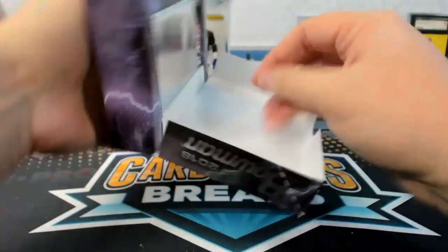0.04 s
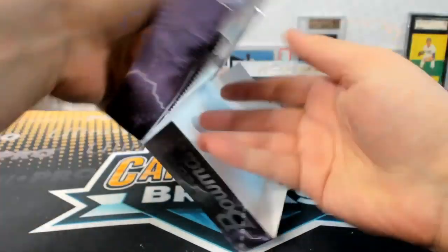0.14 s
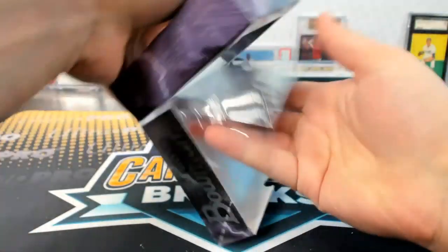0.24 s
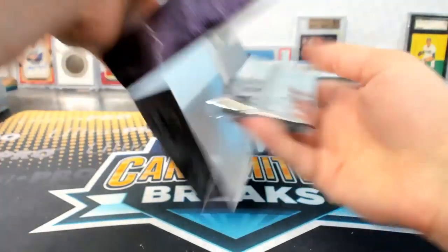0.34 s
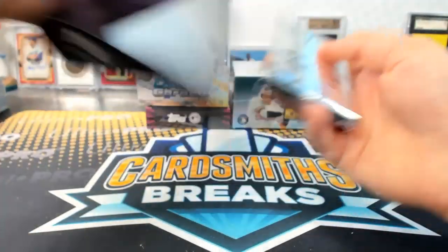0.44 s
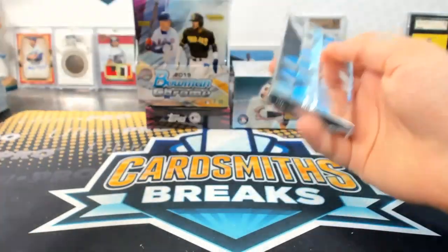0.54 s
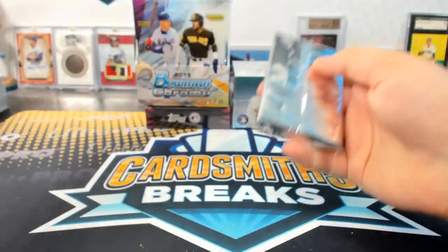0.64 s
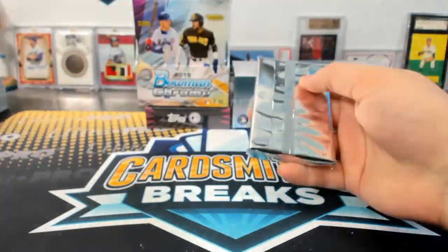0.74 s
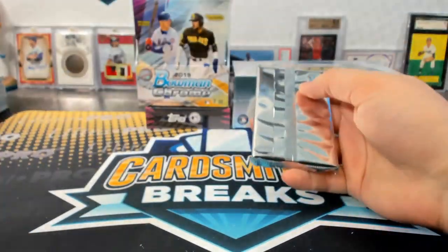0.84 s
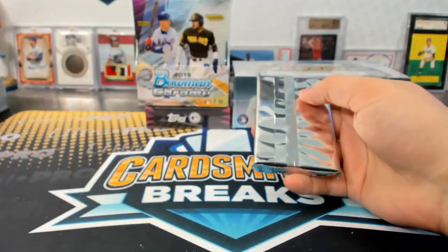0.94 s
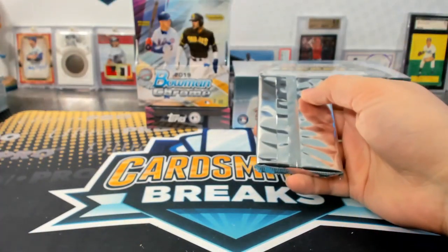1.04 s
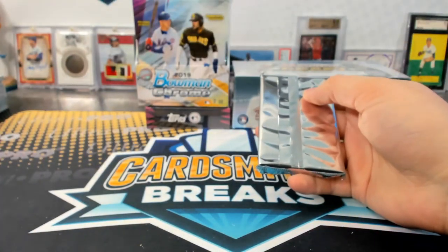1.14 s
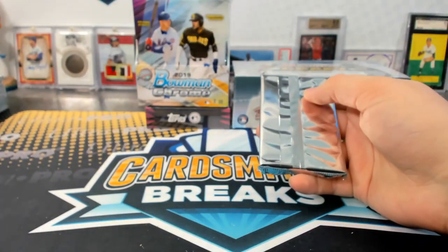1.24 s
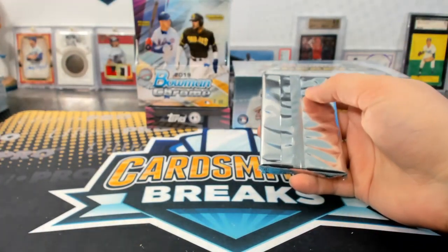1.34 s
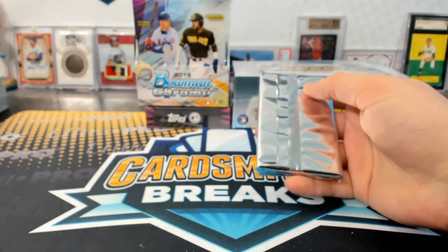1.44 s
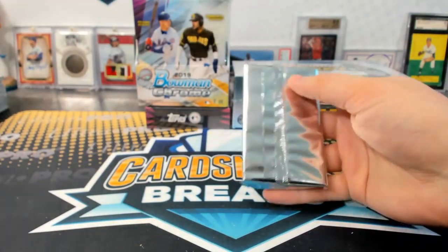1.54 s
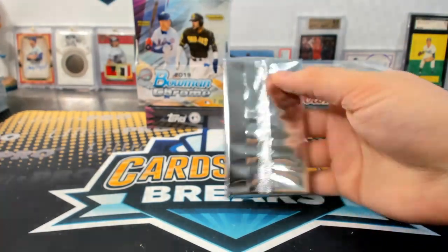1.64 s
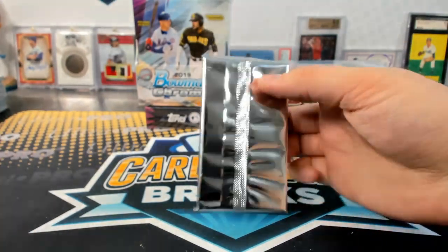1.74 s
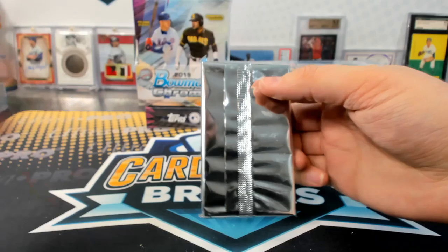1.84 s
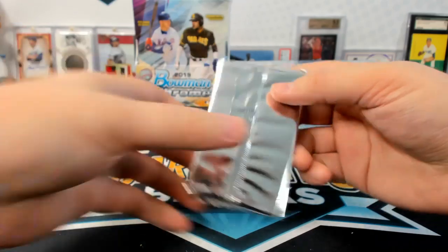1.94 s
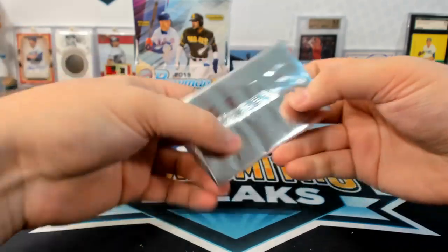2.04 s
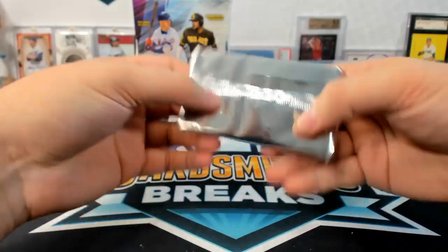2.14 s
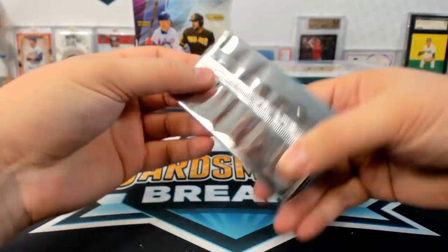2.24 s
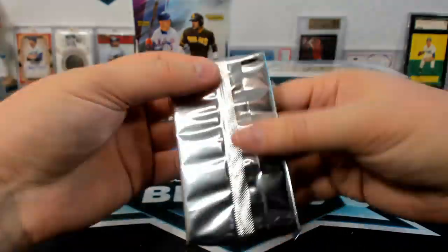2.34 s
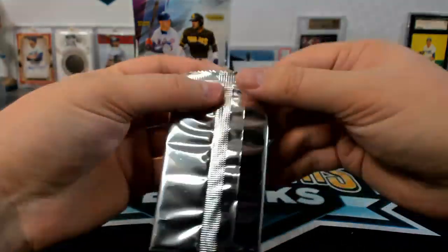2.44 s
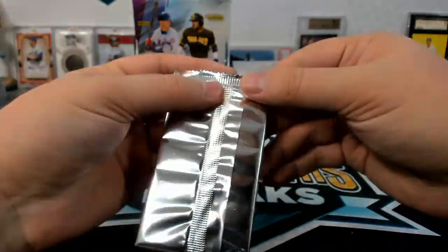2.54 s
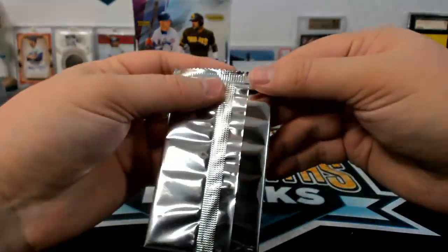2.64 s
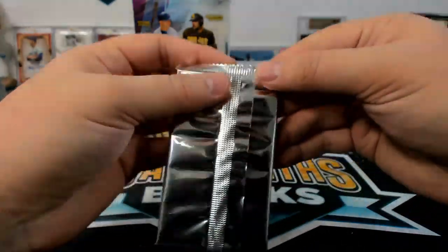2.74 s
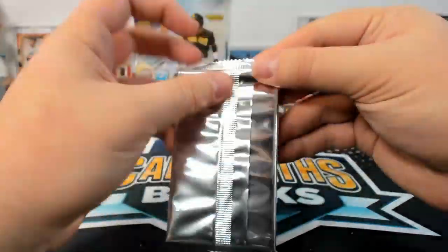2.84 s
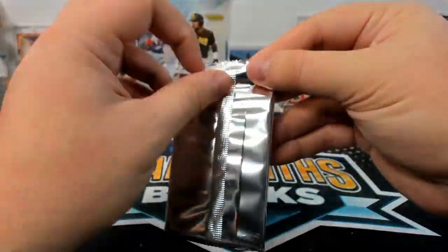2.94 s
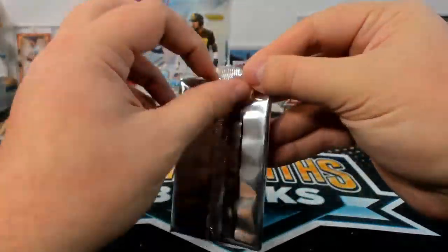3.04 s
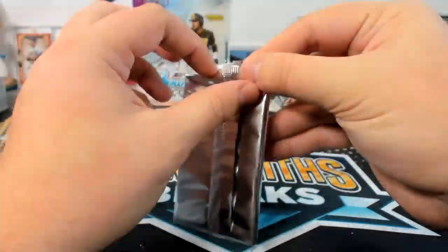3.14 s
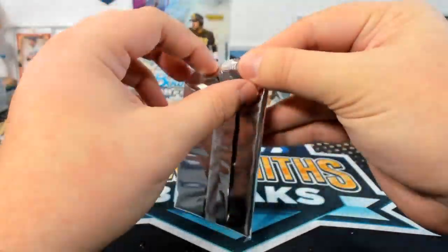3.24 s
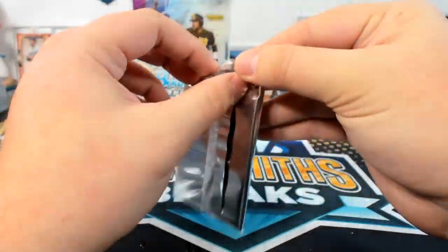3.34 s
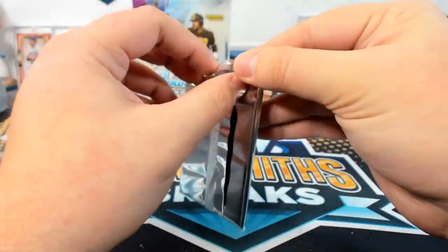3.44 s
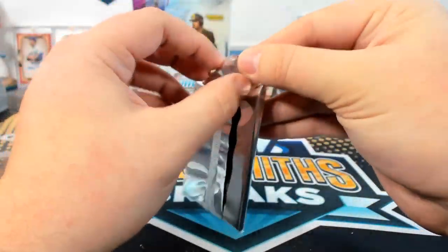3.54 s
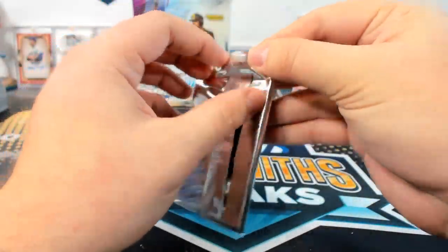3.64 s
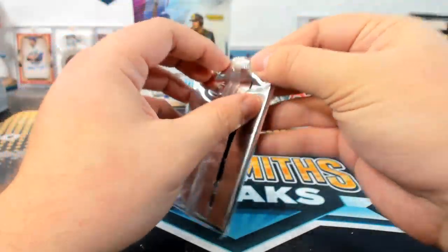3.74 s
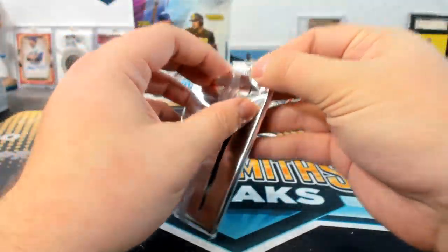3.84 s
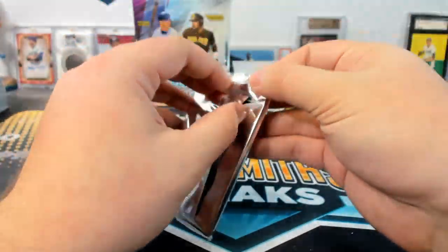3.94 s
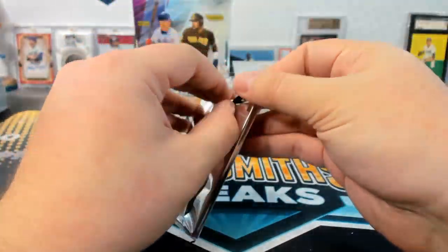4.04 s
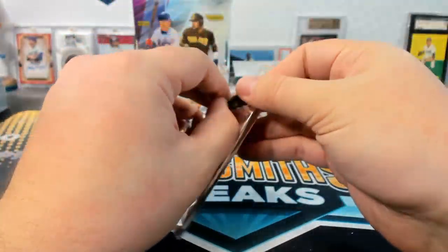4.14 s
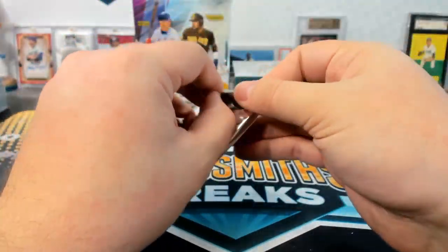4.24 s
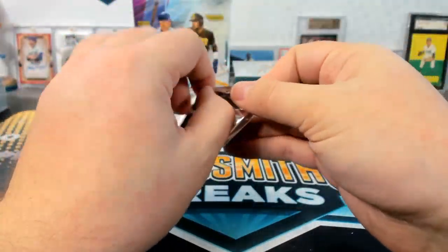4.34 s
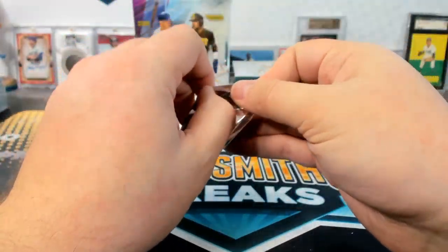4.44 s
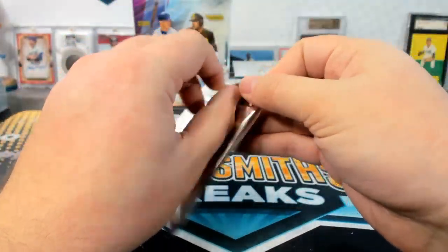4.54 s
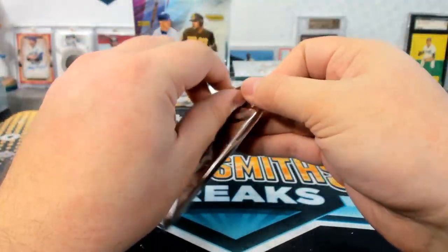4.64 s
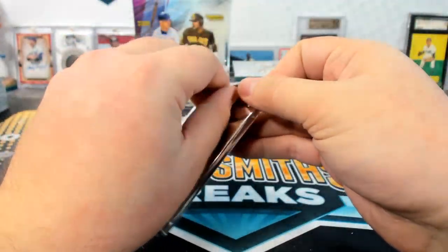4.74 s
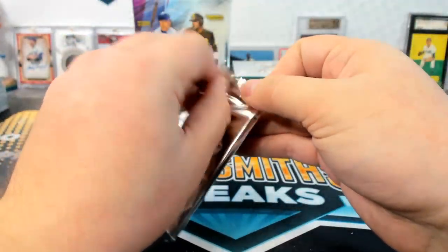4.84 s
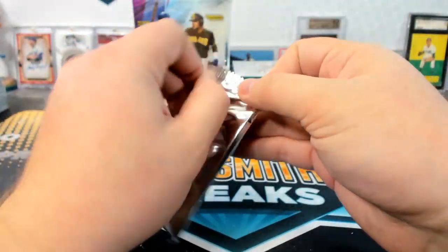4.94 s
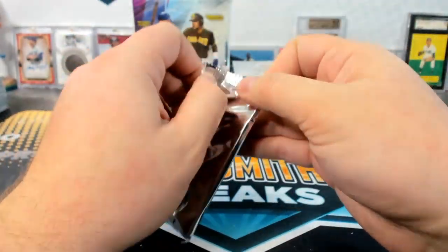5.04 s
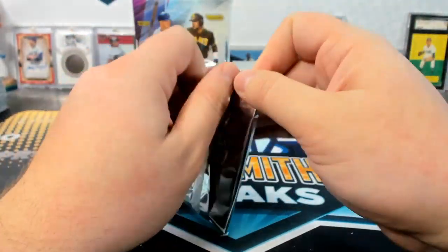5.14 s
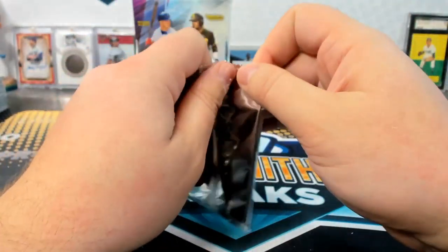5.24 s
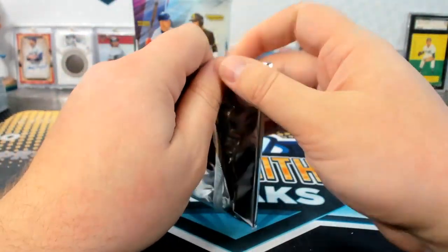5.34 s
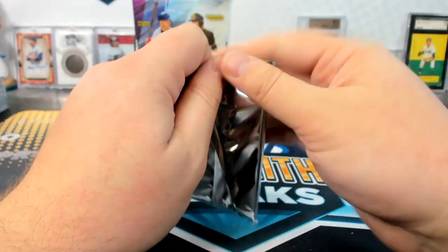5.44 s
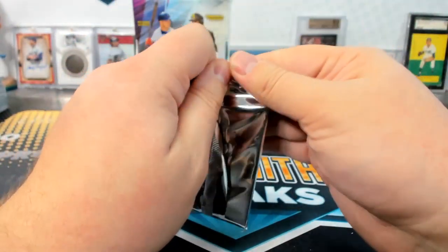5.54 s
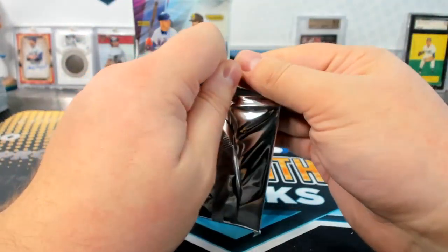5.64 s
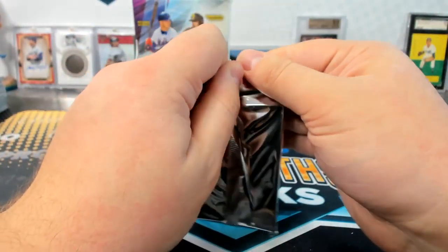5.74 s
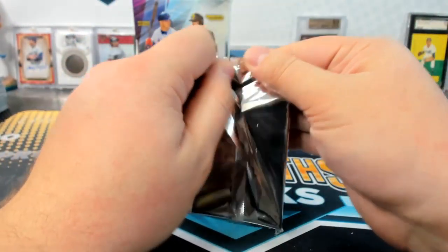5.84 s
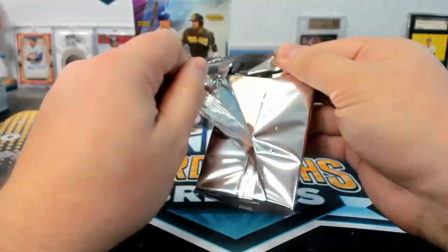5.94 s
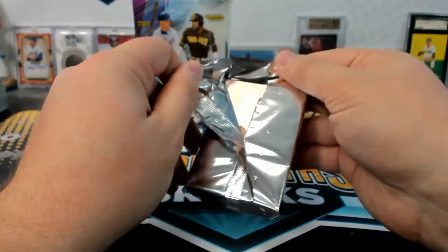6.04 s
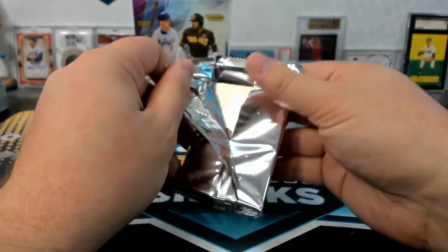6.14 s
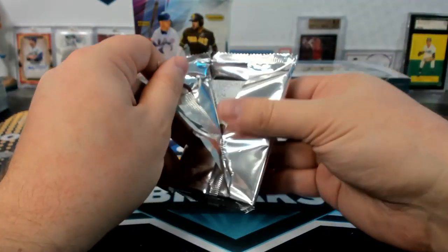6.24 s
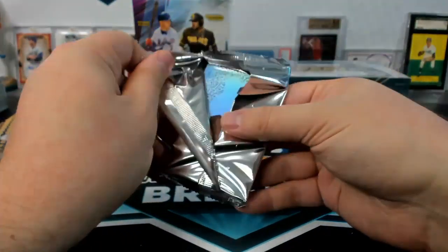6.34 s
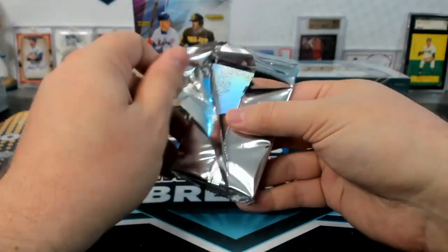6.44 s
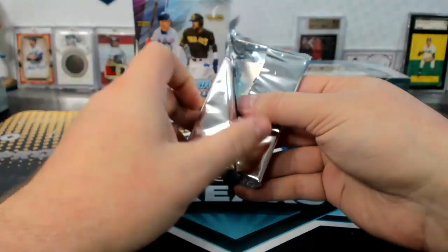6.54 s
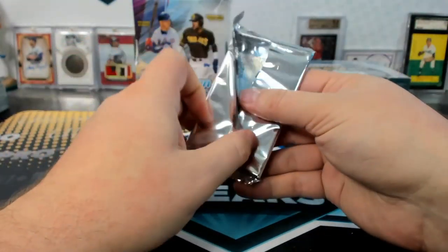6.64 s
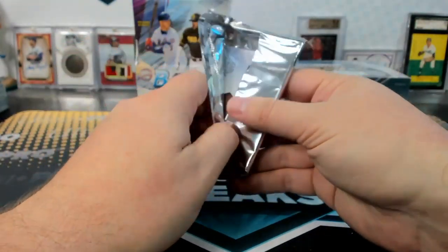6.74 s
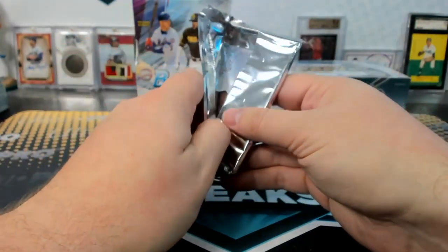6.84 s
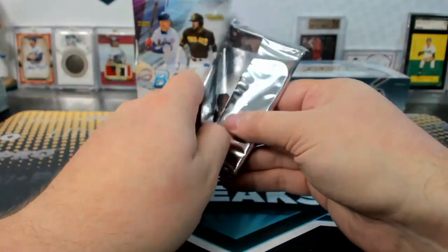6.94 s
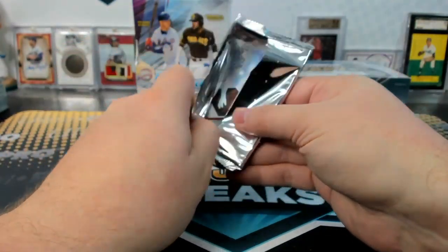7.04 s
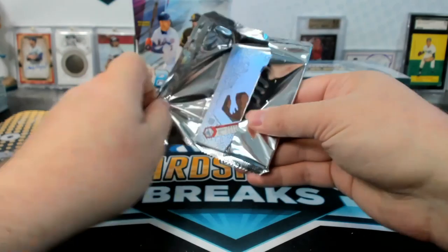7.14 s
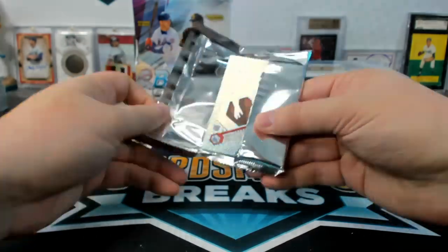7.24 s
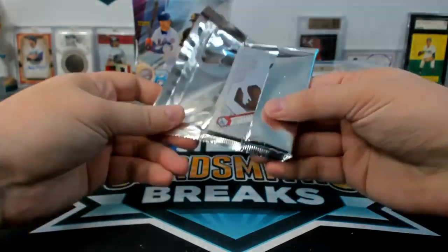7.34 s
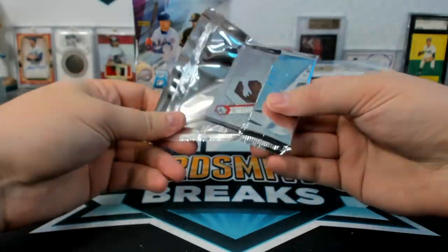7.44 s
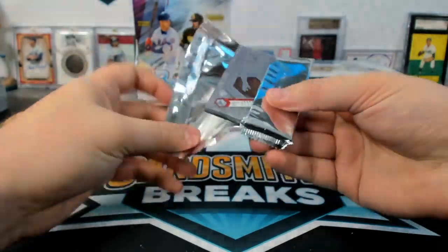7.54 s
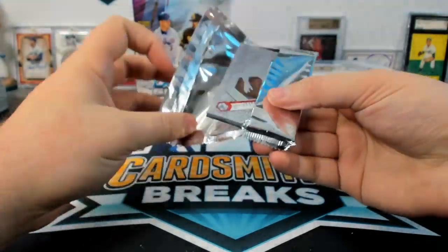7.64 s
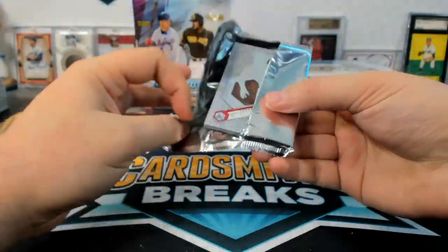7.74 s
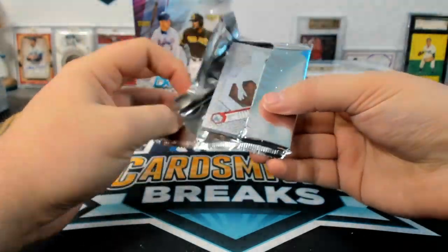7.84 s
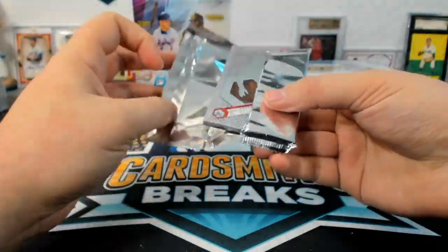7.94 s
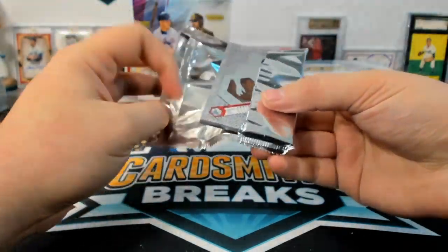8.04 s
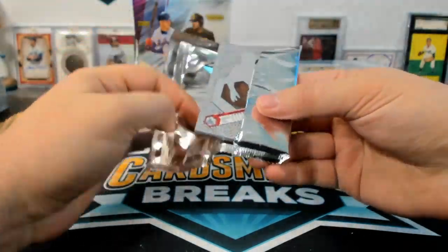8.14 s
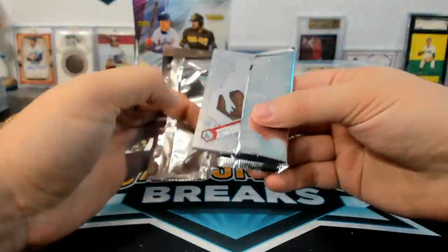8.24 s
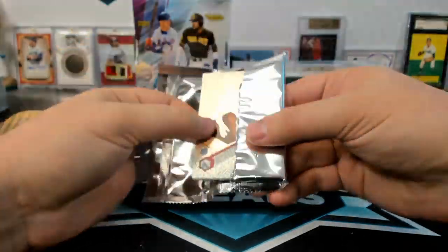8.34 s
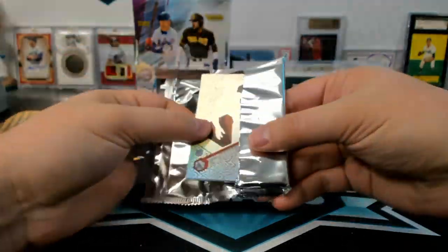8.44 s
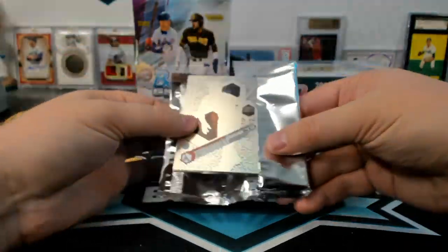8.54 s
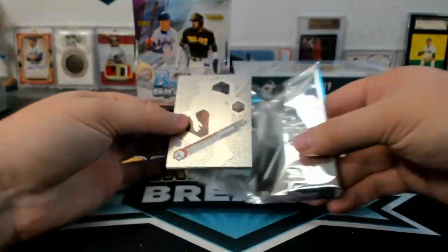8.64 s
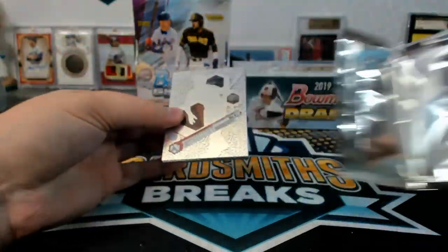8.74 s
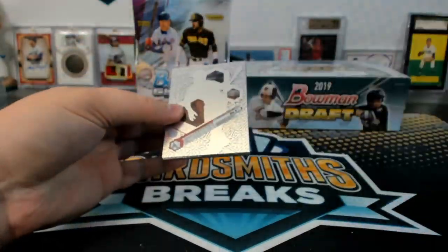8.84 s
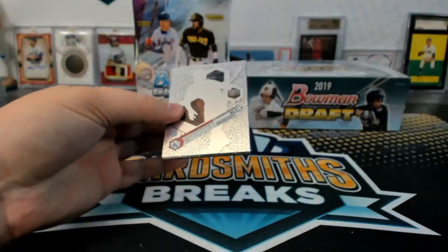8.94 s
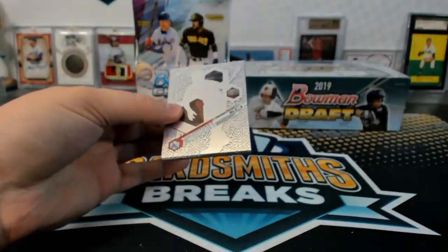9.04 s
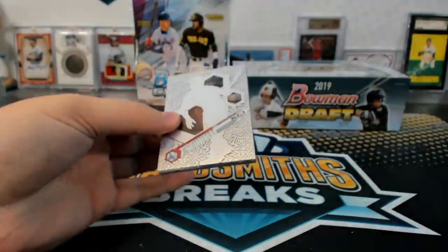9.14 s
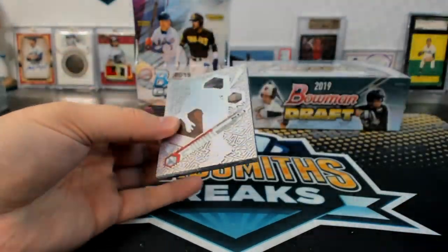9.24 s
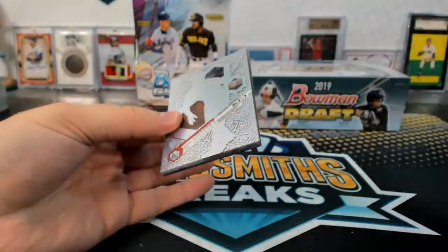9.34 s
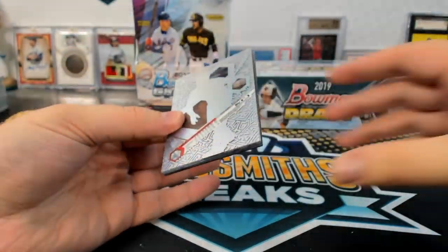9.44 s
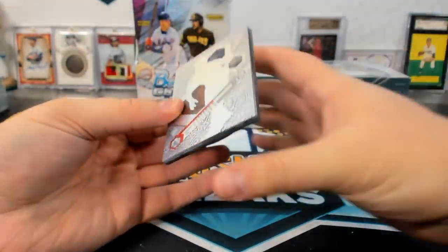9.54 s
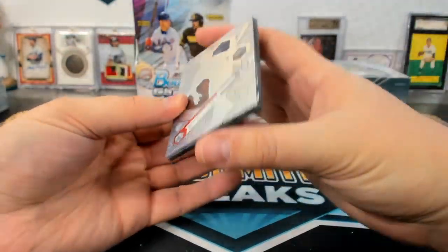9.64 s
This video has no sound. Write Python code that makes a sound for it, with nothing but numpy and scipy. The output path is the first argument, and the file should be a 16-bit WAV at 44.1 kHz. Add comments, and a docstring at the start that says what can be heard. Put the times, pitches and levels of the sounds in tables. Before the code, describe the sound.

A small quiet room, miked closely at a desk, with faint low air noise. From 0 to 0.9 seconds, short cardboard scrapes, a light knock at 0.25 and small rubs as a foil pack slides from its box. It is nearly still until 1.6, when the empty box lands a little farther off, clattering and bouncing hollowly until about 2.0, its panels flexing with a quick falling note. From 2.1 thin foil ticks begin, sparse and crisp, thickening from 4 into lively crackling, with strong rips near 5 and 6. The loosened wrapper sounds fuller; the loudest crunching burst comes around 7.0 to 7.25. Rustles then thin out through 8 to 9.1, followed by a brief scrape and one sharp tap at 9.3. Soft low thumps from hands on the desk recur, and a barely audible thin whine lingers mid-way.

```python
"""At a desk in a small room, a foil card pack is pulled from a cardboard box and torn open near a microphone.
Scrapes of card, then of foil, are strokes of tiny slips; snaps, scrapes and a tap are short noise bursts.
The empty box is tossed aside and bounces: rattles excite its panels, and a falling note is their flexing.
Hands bump the desk and low thumps shake it, over faint air and a thin whine; reflections answer foil and box."""
import sys
import numpy as np
from scipy import signal
from scipy.fft import rfft, irfft
from scipy.io import wavfile
from scipy.ndimage import uniform_filter1d

SR = 44100
rng = np.random.default_rng(int(sys.argv[2]) if len(sys.argv) > 2 else 0)


def to_wav(s):
    """Save 16-bit WAV."""
    ch = np.atleast_2d(s).T  # columns
    pcm = np.round(np.clip(ch, -1, 1) * 32767)  # PCM
    wavfile.write(sys.argv[1], SR, pcm.astype(np.int16))


N = 427769
TIME = np.arange(N) / SR

# Strokes of rubbing: cardboard scrapes at first, then foil crushed and torn:
# start t/s, length t/s, level/dB before trim, pitch f/Hz
RUBBING_STROKES = [(0.0, 0.081, -52.5, 1870), (.132, 0.011, -43, 2500), (.161, 0.011, -43.5, 2200),
                   (0.227, 0.015, -43.5, 2770), (.297, 0.032, -30, 3000), (0.335, 0.18, -61, 1274),
                   (0.481, 0.079, -56, 3000), (0.528, 0.21, -56, 1140), (0.72, .13, -63.5, 1730),
                   (0.873, 0.12, -61, 1300), (1.59, .015, -47.5, 1520), (2.037, 0.045, -41, 4100),
                   (2.257, 0.038, -45.5, 2680), (2.31, 0.044, -52.5, 3530), (2.471, 0.13, -48.5, 7000),
                   (2.651, 0.055, -55.5, 6500), (2.794, 0.096, -49.5, 5000), (3.206, .3, -71, 4000),
                   (3.624, 0.019, -54.5, 2600), (3.659, 0.11, -49, 5000), (3.921, 0.19, -56, 2580),
                   (4.07, 0.45, -54.5, 3500), (4.594, 0.11, -44, 4130), (4.748, 0.11, -47, 4000),
                   (4.872, 0.12, -31.5, 4700), (5.057, 0.24, -43, 4250), (5.268, .22, -65, 4000),
                   (5.528, 0.017, -42.5, 2400), (5.562, 0.36, -54, 3500), (5.84, 0.2, -34, 4000),
                   (6.142, 0.072, -44, 2000), (6.329, 0.23, -43.5, 3000), (6.674, .12, -49, 2400),
                   (6.78, 0.034, -48, 1200), (6.871, 0.31, -42.5, 3440), (7.082, 0.12, -30, 3300),
                   (7.151, 0.078, -20.5, 4360), (7.22, 0.061, -24, 2240), (7.411, 0.058, -35.5, 2900),
                   (7.499, 0.047, -47, 2500), (7.591, 0.033, -54, 2500), (7.73, 0.17, -44.5, 2160),
                   (7.929, 0.19, -62.5, 2500), (8.155, 0.052, -68, 1800), (8.215, .14, -61, 2200),
                   (8.376, 0.044, -48, 3000), (8.495, 0.15, -52.5, 3100), (8.591, .19, -49, 2800),
                   (8.797, 0.51, -70, 2500), (9.126, 0.13, -68.5, 1900), (9.021, 0.09, -44.5, 4360),
                   (9.22, .02, -37.5, 4900), (9.359, 0.023, -49, 5620), (9.412, 0.053, -63, 4370)]
# Snaps of the wrapper, with a few short scrapes early on and a tap at 9.283:
# t/s, level/dB over 5 ms before trim, pitch f/Hz, sharpness of that pitch/dB per octave
WRAPPER_SNAPS = [(0.134, -35.5, 2500, 12), (0.164, -42, 2280, 15), (0.399, -51.0, 6800, 5),
                 (0.498, -49, 2800, 4.5), (0.557, -44.5, 1490, 9), (0.787, -47, 1150, 14.0),
                 (1.453, -55, 2300, 8.5), (2.119, -37, 3430, 6.5), (2.471, -44, 5040, 2.5),
                 (2.507, -34.5, 9000, 2), (2.536, -44, 8000, 2.5), (2.698, -43.5, 5700, 4.5),
                 (2.84, -36, 4900, 4.5), (2.884, -31.5, 5860, 5), (2.915, -36.5, 9000, 3.5),
                 (3.024, -49, 9000, 3), (3.064, -42.5, 3850, 5.5), (3.097, -40, 3100, 3),
                 (3.242, -35.5, 6960, 3.5), (3.347, -44.0, 4500, 3.5), (3.378, -37.5, 8500, 6),
                 (3.434, -43, 5700, 4), (3.513, -53.5, 9000, 6), (3.688, -31, 5700, 6),
                 (3.854, -42.5, 4600, 8), (3.961, -41.5, 2820, 4), (4.077, -34, 9000, 1.5),
                 (4.092, -38, 2810, 4), (4.115, -36.5, 3460, 10.0), (4.163, -33, 4280, 10),
                 (4.207, -43, 1600, 1.5), (4.235, -38.5, 4600, 8), (4.255, -35.5, 7200, 4),
                 (4.287, -40.5, 4800, 4), (4.348, -36, 3170, 2), (4.408, -45, 3900, 7.5),
                 (4.487, -36, 4170, 5), (4.611, -39.5, 3300, 1), (4.66, -36, 9000, 1.5),
                 (4.689, -39, 3320, 14), (4.74, -37.5, 4550, 5), (4.749, -33.5, 4650, 12),
                 (4.792, -36, 1820, 3.5), (4.886, -33, 5100, 4), (4.902, -26.5, 9000, 1),
                 (4.932, -32, 9000, -1.5), (4.991, -26.5, 3700, 3.5), (5.034, -38.5, 2860, 7),
                 (5.1, -24.5, 3770, 24), (5.14, -29, 5100, 2.5), (5.2, -30, 3500, 4),
                 (5.223, -34.5, 9000, 7), (5.249, -41.5, 3300, 5), (5.298, -31.5, 5000, 8),
                 (5.314, -34, 6000, 4), (5.357, -34.5, 5340, 4), (5.378, -35.5, 2560, 5.5),
                 (5.421, -35.5, 3280, 7.5), (5.466, -38, 3700, 6.5), (5.541, -36, 1900, 5.5),
                 (5.602, -32.5, 2760, 4.0), (5.656, -30, 4300, 5.0), (5.685, -35, 9000, 4),
                 (5.713, -32, 4400, 7.5), (5.808, -29, 7600, 5.5), (5.876, -27.5, 3100, 0.5),
                 (5.902, -30.5, 3900, 5.0), (5.932, -27.5, 1250, 5.5), (5.957, -21.5, 3700, 4.5),
                 (5.967, -23, 1000, -0.5), (6.141, -43, 4300, 8.0), (6.157, -38.5, 2500, 4.5),
                 (6.189, -38, 1200, 1), (6.306, -37.0, 1310, 3.5), (6.363, -37, 3100, 0.5),
                 (6.4, -31, 1330, 2), (6.412, -26, 6400, 4.5), (6.504, -44.5, 9000, 9),
                 (6.526, -33, 3300, 1), (6.593, -38.5, 2700, 9.5), (6.68, -41, 8500, 4),
                 (6.702, -44, 2520, 15), (6.74, -39, 2800, 15), (6.821, -34, 2370, 13),
                 (6.85, -31, 2960, 3.5), (6.918, -39, 2530, 6.5), (6.967, -31, 2330, 3.5),
                 (7.024, -24.0, 3260, 3.5), (7.048, -25.5, 9000, 0), (7.093, -22, 7600, 8.5),
                 (7.123, -23.0, 3700, 1), (7.162, -19.5, 4100, 4.5), (7.196, -21.5, 1110, 0.5),
                 (7.23, -18.5, 2520, 2), (7.333, -41, 2900, 3), (7.404, -36, 9000, 5),
                 (7.435, -35, 1500, 3), (7.509, -38, 1630, 7), (7.606, -37.5, 3700, 2.5),
                 (7.613, -31.5, 5140, 4.5), (7.744, -36, 2700, 9.5), (7.795, -37, 2100, 6),
                 (7.868, -32, 3700, 3.5), (7.891, -34.5, 2920, 1.5), (7.934, -36.5, 1000, 0),
                 (8.026, -45.5, 3950, 2), (8.214, -44.5, 2220, 11), (8.356, -50.5, 2700, 10.5),
                 (8.492, -51, 2200, 6.5), (8.586, -34, 5850, 5.5), (8.646, -41.5, 1100, 0.5),
                 (8.758, -46.0, 3740, 4.5), (8.877, -45.5, 2520, 8), (8.947, -53, 2020, 11),
                 (9.04, -45, 3300, 1.5), (9.067, -36, 4060, 3.5), (9.094, -41.5, 2580, 4),
                 (9.283, -25.5, 2700, 7)]
# Tone of the foil: f/Hz, level/dB
FOIL_TONE = [(150, -21), (400, -4), (700, 2), (1000, 1), (1450, -1), (2150, 0), (2900, -0.5), (4500, 3),
             (8000, 0), (13000, -4), (16000, -11.5)]
# Hollow resonances of the opened wrapper: f/Hz, width/Hz, level/dB
POUCH_MODES = [(590, 150, 1), (1080, 180, 2), (1700, 100, 3), (2430, 120, 0.5)]
# Knocks on cardboard: t/s, level/dB, rise t/s, decay t/s, tilt/dB per octave, note of the struck panel f/Hz
BOX_KNOCKS = [(0.001, -44, 0.00025, 0.031, -3.5, 253), (0.202, -35.5, 0.0084, 0.015, -3.5, 222),
              (0.247, -28, 0.00031, 0.0064, -0.5, 805), (1.603, -24.5, 0.0013, 0.041, 0, 576),
              (1.645, -32.5, 0.012, 0.042, -8, 170), (1.684, -23, 0.0069, 0.028, 0.2, 790),
              (1.82, -36.5, 0.0012, 0.054, -2.5, 594), (1.931, -35.5, 0.0032, 0.056, -1.5, 720),
              (2.009, -35, 0.011, 0.02, -2.5, 513), (2.193, -49, 0.005, 0.049, -2, 620),
              (2.338, -50, 0.0093, 0.034, -2.5, 272), (9.283, -38, 0.0005, 0.0031, 2, 722)]
# Tone of the hollow box: f/Hz, level/dB
BOX_TONE = [(50, -21.5), (75, -9), (110, -4), (200, -1.5), (500, -6.5), (900, -2.5), (1200, -5.5),
            (2800, -10), (3600, -15), (6500, -18), (11000, -30.5), (16000, -37.5)]
# Resonances of the box panels: f/Hz, width/Hz, level/dB
BOX_MODES = [(125, 10, 6), (156, 4.9, 3), (238, 15, 7.5), (296, 30, 6.5), (364, 13, 3.5), (525.3, 38, 8),
             (666, 66, 5), (775.5, 13, 6), (896.4, 46, 3)]
# How heavily the forearms lean and shift on the desk: t/s, level/dB before trim
FOREARM_LEAN = [(0.0, -52), (.55, -50), (1.1, -70.5), (1.5, -71.5), (1.9, -60), (2.6, -62.5), (3.2, -60.5),
                (4.0, -66), (5.1, -61.5), (5.8, -56), (7.2, -51.5), (8.3, -55), (9.25, -52), (9.45, -61.5),
                (9.56, -71.5)]
# Low thumps on the desk, from hands and from the box landing: t/s, level/dB before trim, pitch f/Hz
DESK_THUMPS = [(0.199, -34.5, 90), (.88, -48, 70), (1.611, -42, 75), (2.86, -52, 150), (3.07, -51.5, 140),
               (4.52, -57, 60), (5.669, -42.5, 60), (6.589, -45, 110), (7.169, -38, 40), (7.811, -42.5, 60),
               (8.689, -42.5, 55), (8.98, -45.5, 110), (9.2, -48.5, 130)]
# Tone of the desk: f/Hz, level/dB
DESK_TONE = [(8, 10), (18, 8), (30, -9), (45, -1.5), (80, -14), (110, -7.5), (160, -12), (200, -17),
             (280, -19.5), (500, -38.5), (1500, -70.5)]
# Resonances of the desk: f/Hz, width/Hz, level/dB
DESK_MODES = [(55.3, 14, 10.5), (120, 11, 9.5)]
# Tone of the quiet air: f/Hz, level/dB
AIR_TONE = [(30, -1.5), (120, -9.5), (300, -18.5), (1200, -30.5), (2500, -47.5), (16000, -50.5)]
# Loudness of the faint whine: t/s, level/dB
WHINE_LEVEL = [(2.5, -100), (2.9, -72), (4.6, -73), (6.4, -80), (7.4, -100)]
# Band of hiss around the whine: f/Hz, level/dB
WHINE_BAND = [(300, -35.5), (540, -9), (635, -5.5), (760, -10.5), (1400, -42)]
# Decay of the room: f/Hz, time to fall 60 dB t/s
ROOM_DECAY = [(150, 0.14), (400, 0.43), (1000, 0.29), (3000, 0.2), (6000, 0.2), (10000, 0.2), (16000, .17)]

OPEN_S = 6.5  # from here on the wrapper hangs loose
BOXED_S = 1.5  # until here the pack slides over card
AIR_DB, WHINE_HZ, EDGE_HZ = -76, 624, 16100


def amp(db):
    """Decibels to gain."""
    return 10 ** (np.asarray(db) / 20)


def unit(x):
    """Scales to rms 1."""
    return x / np.sqrt(np.mean(x ** 2) + 1e-20)


def add(mix, s, sound):
    """Lays a sound into the mix at time s."""
    part = mix[max(round(s * SR), 0):][:len(sound)]
    part += sound[:len(part)]


def bins(size):
    """Frequencies of a spectrum of that many samples."""
    return np.fft.rfftfreq(size, 1 / SR)


def read(points, hz):
    """A curve joined by straight lines over log frequency."""
    f, value = np.transpose(points)
    return np.interp(np.log(hz + 1), np.log(f), value)


def humps(modes, hz):
    """Resonance peaks as a dB spectrum."""
    return sum(db / (1 + (2 * (hz - f) / width) ** 2) for f, width, db in modes)


def ring(db):
    """The causal, minimum-phase impulse response that has this dB spectrum."""
    cepstrum = irfft(np.log(amp(db)))
    half = len(cepstrum) // 2
    # folding the cepstrum onto positive times puts the energy first
    cepstrum[1:half] *= 2
    cepstrum[half + 1:] = 0
    return irfft(np.exp(rfft(cepstrum)))[:half]


def colour(x, points, modes=(), size=32768):
    """Passes x through a body with that spectrum and those resonances; rms 1."""
    hz = bins(size)
    body = ring(read(points, hz) + humps(modes, hz))
    return unit(signal.oaconvolve(x, body)[:len(x)])


def grains(length, per_s, spread_db, most=3):
    """Random tiny slips, mostly weak, a few strong."""
    strength = np.minimum(rng.exponential(1, length), most)
    return amp(spread_db * strength) * (rng.random(length) < per_s / SR)


def facet(s, db, pitch, sharp, ripple_db, loose_db=9, loose_hz=310, taut_db=-5, taut_hz=600,
          firm_db=-42, dulling=0.82, dull_hz=8000, smooth_bins=12, size=1024):
    """The ring of one patch of the sheet: a broad peak, with narrow modes of its own scattered over it."""
    hz = bins(size)
    peak = -sharp * np.hypot(np.log2((hz + 1) / pitch), .3)
    modes = ripple_db * unit(uniform_filter1d(rng.standard_normal(len(hz)), smooth_bins))
    if s > OPEN_S:  # a free sheet moves more air and rings hollow
        sheet = loose_db / (1 + (hz / loose_hz) ** 4) + humps(POUCH_MODES, hz)
    else:  # stretched over the cards it sounds thin
        sheet = taut_db / (1 + (hz / taut_hz) ** 4)
    # soft bends lack top treble
    gentle = dulling * min(db - firm_db, 0) * hz ** 4 / (hz ** 4 + dull_hz ** 4)
    return ring(read(FOIL_TONE, hz) + peak + modes + sheet + gentle)


def rubbing(per_s=300, boxed_per_s=1700, spread_db=7.0, grain_s=0.0012, sharp=7, scatter_octaves=0.75,
            ripple_db=2.5, trim_db=-1, patches=5):
    """In each stroke several patches crackle, every one with its own ring and its own run of slips."""
    out, fade = np.zeros(N), np.exp(-1 / (grain_s * SR))
    for start, length, db, pitch in RUBBING_STROKES:
        t = np.arange(0, length, 1 / SR)
        crackle = np.zeros(len(t))
        rate = boxed_per_s if start < BOXED_S else per_s  # slips come thickly over card
        for octaves in scatter_octaves * np.linspace(-1, 1, patches):
            slips = signal.lfilter([1], [1, -fade], grains(len(t), rate, spread_db))
            slips = slips * rng.standard_normal(len(t))
            patch = facet(start, db, pitch * 2 ** octaves, sharp, ripple_db)
            crackle += signal.fftconvolve(slips, patch)[:len(t)]
        # pressure peaks early in the stroke
        pressure = np.interp(t / length, [0, 0.3, 1], [.2, 1, 0.09])
        add(out, start, amp(db + trim_db) * pressure * unit(crackle))
    return out


def desk(trim_db=5.5, bumps_per_s=140, spread_db=3):
    """Small bumps of the hands ring the desk and travel up the microphone stand."""
    bumps = grains(N, bumps_per_s, spread_db) * rng.choice([-1, 1], N)
    lean_db = np.interp(TIME, *np.transpose(FOREARM_LEAN))
    return colour(bumps, DESK_TONE, DESK_MODES) * amp(lean_db + trim_db)


def room_air():
    """Quiet air: steady noise, strongest in the bass."""
    return amp(AIR_DB) * colour(rng.standard_normal(N), AIR_TONE)


def box(panel_db=6, panel_octaves=0.17, size=16384):
    """Each knock sets the flaps rattling and the hollow body booming, most of all the panel that is struck."""
    out, hz, t = np.zeros(N), bins(size), np.arange(size) / SR
    body = read(BOX_TONE, hz) + humps(BOX_MODES, hz)
    for s, db, rise, decay, tilt, note in BOX_KNOCKS:
        octaves = np.log2((hz + 10) / note)
        struck = panel_db * np.exp(-(octaves / panel_octaves) ** 2)
        panel = ring(body + tilt * octaves + struck)
        # the rattle holds for one more rise time before it decays
        rattle = np.minimum(t / rise, 1) * np.exp(-np.maximum(t - 2 * rise, 0) / decay)
        knock = signal.fftconvolve(rattle * rng.standard_normal(size), panel)
        add(out, s, amp(db) * knock * np.linalg.norm(rattle) / np.linalg.norm(knock))
    return out


def flexing(from_hz=680, to_hz=170, fall_s=.028, ring_s=0.036, rise_s=0.0023, full_s=.03, waver=0.056,
            trim_db=-6, size=12000):
    """A knock bends a panel, whose note drops as it goes slack; a mere tap hardly bends it."""
    out, t = np.zeros(N), np.arange(size) / SR
    note = to_hz + (from_hz - to_hz) * np.exp(-t / fall_s)
    envelope = np.minimum(t / rise_s, 1) * np.exp(-t / ring_s)
    for s, db, _, decay, _, _ in BOX_KNOCKS:
        wobble = unit(uniform_filter1d(rng.standard_normal(size), size=300))
        phase = 2 * np.pi * np.cumsum(note * (1 + waver * wobble)) / SR
        bend = min(decay / full_s, 1)  # knocks that decay sooner bend the panel less
        add(out, s, amp(db + trim_db) * bend * envelope * np.sqrt(2) * np.sin(phase))
    return out


def bending_wave(spread_s, size=128):
    """A click that has crossed the sheet: its treble travels faster and arrives first."""
    hz = bins(size)
    delay = .0002 + spread_s * (1 - np.sqrt(hz / hz[-1]))
    # phase is the running sum of delay over frequency
    return irfft(np.exp(-2j * np.pi * np.cumsum(delay) * hz[1]))


def with_followers(within_s=.022, after_db=-10.5, weaker_db=2, octaves=0.67):
    """Every snap, and a weaker one just after it at a nearby pitch, as a neighbouring crease follows."""
    after = []
    for s, db, pitch, sharp in WRAPPER_SNAPS:
        wait, weak, shift = rng.random(3)
        near_pitch = pitch * 2 ** (octaves * (2 * shift - 1))
        after.append((s + within_s * wait, db + after_db - weaker_db * weak, near_pitch, sharp))
    return list(WRAPPER_SNAPS) + after


def snaps(crack=1.8, spread_s=.0011, give_s=0.00094, give_hz=3520, give_slope=.3, rise=0.37, echo=0.46,
          echo_s=.0023, hiss=0.035, hiss_s=0.0031, ripple_db=2.0, trim_db=0.51, lead_s=.005, size=1300):
    """One crack and a noise burst, which the desk scatters back; a faint hiss swells and fades around each crack."""
    out, t = np.zeros(N), np.arange(size) / SR - lead_s
    first = crack * bending_wave(spread_s)
    for s, db, pitch, sharp in with_followers():
        # larger, lower facets take longer to give
        age = np.maximum(t, 0) / (give_s * (give_hz / pitch) ** give_slope)
        give = (1 - np.exp(-age / rise)) * np.exp(-age)
        back = np.interp(t - echo_s * rng.uniform(0.63, 1.3), t, give)
        around = hiss * np.exp(-abs(t) / hiss_s)
        burst = (give + echo * back + around) * rng.standard_normal(size)
        add(burst, lead_s - spread_s / 2, first)
        snap = np.convolve(burst, facet(s, db, pitch, sharp, ripple_db))
        snap *= np.sqrt(SR / 200) / np.linalg.norm(snap)  # energy of rms 1 over 5 ms
        add(out, s - lead_s, amp(db + trim_db) * snap)
    return out


def thumps(rise_s=.015, fall_s=0.051, sharp=7, trim_db=-1, size=16384):
    """A soft push that swells and dies away, ringing the desk most near its own pitch."""
    out, hz, t = np.zeros(N), bins(size), np.arange(size) / SR
    push = np.minimum(t / rise_s, 1) * np.exp(-t / fall_s)
    for s, db, pitch in DESK_THUMPS:
        focus = -sharp * abs(np.log2((hz + 1) / pitch))
        body = ring(read(DESK_TONE, hz) + humps(DESK_MODES, hz) + focus)
        thump = signal.fftconvolve(push * rng.standard_normal(size), body)
        thump *= np.linalg.norm(push) / push.max() / np.linalg.norm(thump)
        add(out, s, amp(db + trim_db) * thump)
    return out


def whine(waver=0.005, flicker=0.25, halo_db=-5):
    """A thin tone, slightly wavering in pitch and strength, in a narrow band of hiss."""
    drift, swell = (unit(uniform_filter1d(row, size=1200)) for row in rng.standard_normal((2, N)))
    phase = 2 * np.pi * np.cumsum(WHINE_HZ * (1 + waver * drift)) / SR
    tone = np.sqrt(2) * (1 + flicker * swell) * np.sin(phase)
    halo = amp(halo_db) * colour(rng.standard_normal(N), WHINE_BAND)
    return (tone + halo) * amp(np.interp(TIME, *np.transpose(WHINE_LEVEL)))


def room(x, wet_db, gap_s=0.0029, shift_s=.37, patterns=3, taps_per_s=5000, size=22050):
    """Adds sparse reflections, each band dying at its own speed; their pattern shifts as the source moves."""
    out = x.copy()
    for k in range(patterns):
        taps = rng.standard_normal(size) * (rng.random(size) < taps_per_s / SR)
        hz, t, z = signal.stft(taps, SR, nperseg=256)
        decay = amp(-60 * t / read(ROOM_DECAY, hz)[:, None])
        tail = signal.istft(z * decay, SR)[1]
        # silent for the gap, then fading in over another
        tail = tail * np.clip(np.arange(len(tail)) / SR / gap_s - 1, 0, 1)
        # the patterns trade places at constant total power
        share = np.sqrt(2 / patterns) * np.cos(np.pi * (TIME / shift_s + k / patterns))
        out += amp(wet_db) * signal.oaconvolve(x * share, tail / np.linalg.norm(tail))[:N]
    return out


def scene():
    """The wrapper is near, with some reflections; the box sounds drier still."""
    near = room(rubbing() + snaps(), wet_db=-8.5)
    box_sound = room(box() + flexing(), wet_db=-12.5)
    return (near + box_sound + desk() + thumps() + room_air() + whine())[None]


def record(dry):
    """Limits the band with a steep linear-phase low-pass."""
    lowpass = signal.firwin(401, EDGE_HZ, window=("kaiser", 8), fs=SR)
    return signal.oaconvolve(dry, lowpass[None], "same")


dry = scene()
out = record(dry)
to_wav(out)
```